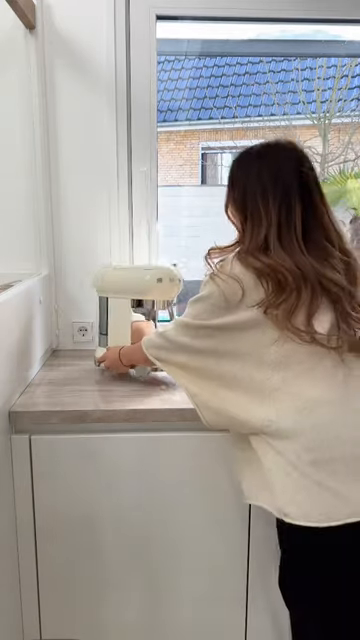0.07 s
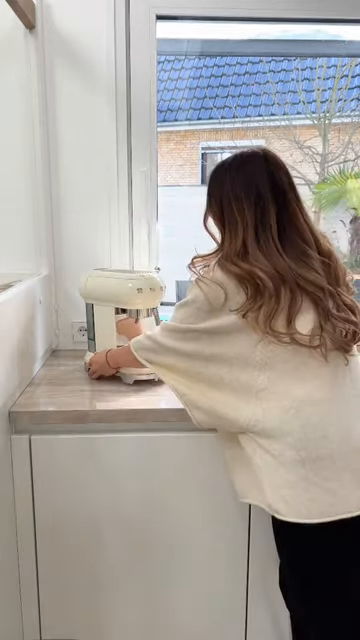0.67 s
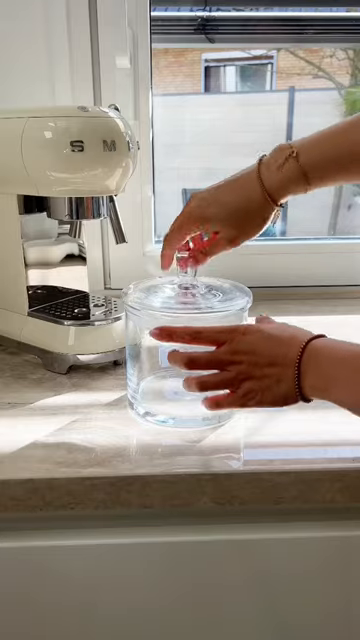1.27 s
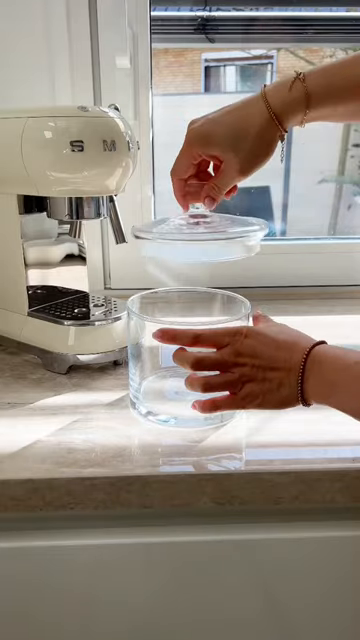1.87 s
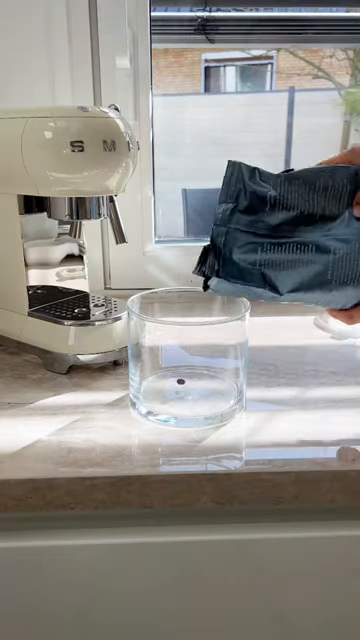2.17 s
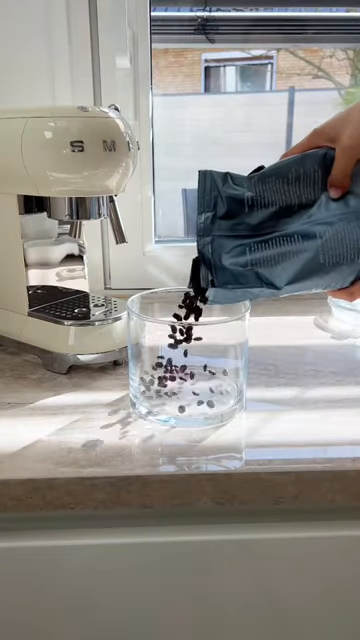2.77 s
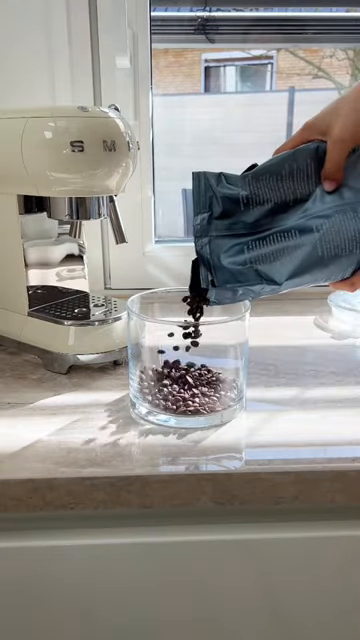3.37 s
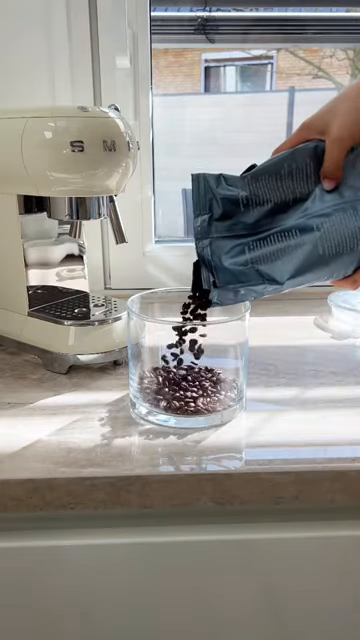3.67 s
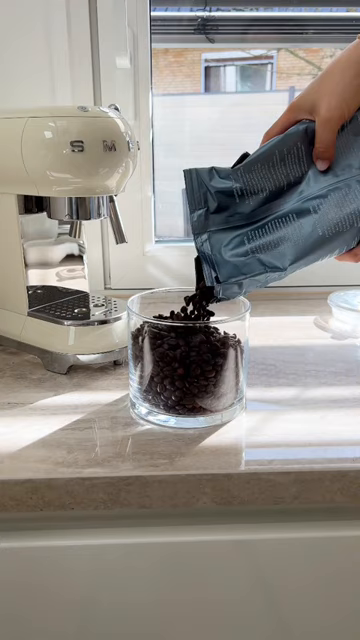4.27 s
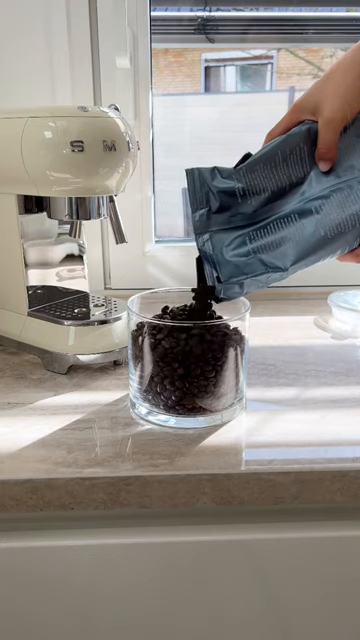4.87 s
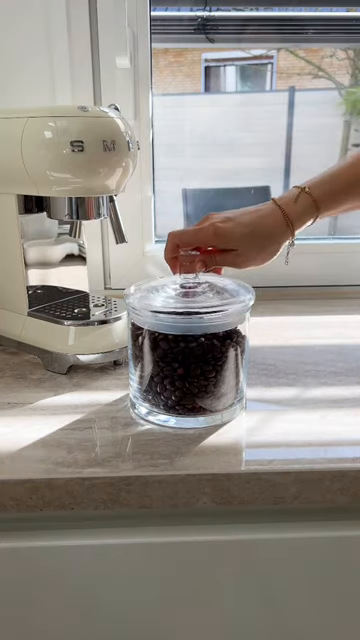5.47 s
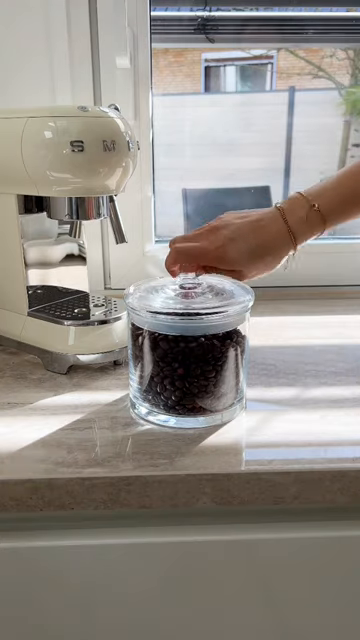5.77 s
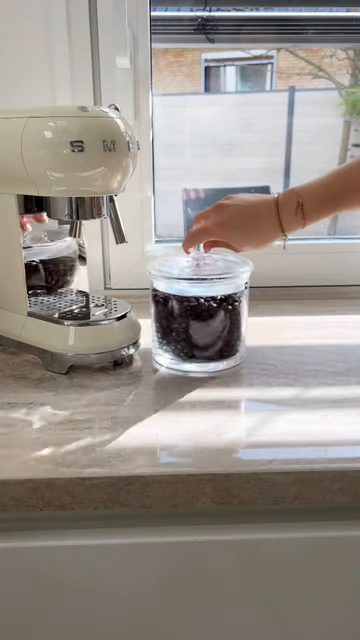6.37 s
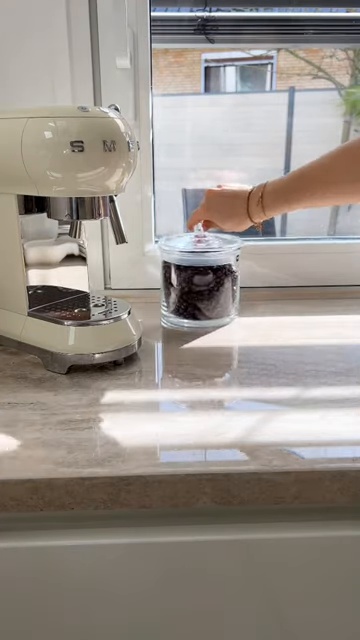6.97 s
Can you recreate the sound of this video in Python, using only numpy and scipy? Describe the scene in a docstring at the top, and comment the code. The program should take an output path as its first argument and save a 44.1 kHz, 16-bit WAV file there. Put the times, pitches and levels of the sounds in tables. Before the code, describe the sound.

A low room rumble lies under a kitchen scene, heard close through a stereo microphone. From about 0.3 seconds a filter holder knocks against an espresso machine, squeaks briefly on its rubber seal and locks with a clack and a low boom near 0.9 seconds. Between 1.3 and 1.8 seconds a glass lid rattles and rubs out of an empty jar, with a tiny squeal. At 2.2 seconds coffee beans tick and tumble inside a bag, and from 2.5 they stream into the jar, clicking brightly and pinging the glass. From about 3.8 seconds the ring is choked by the rising heap and the pour softens, ending near 5.2. The lid clacks back on at 5.5 seconds. From about 6 seconds the full jar scrapes and judders quietly over the stone counter, and the lid settles with small chinks around 7 seconds.

```python
"""Coffee beans pour from a bag into a glass jar on a kitchen counter, close to a stereo microphone.
They click on each other and ping the glass, whose ring is choked as the heap rises.
Before the pour, a filter holder is knocked into an espresso machine and the jar's glass lid is lifted.
After it, the lid clacks back on and the full jar is pushed over the stone, scraping and juddering.
The knocks carry a short kitchen reverberation; a low room rumble lies behind everything."""
import sys
import numpy as np
from scipy import signal
from scipy.fft import rfft, irfft, next_fast_len
from scipy.io import wavfile
from scipy.ndimage import uniform_filter1d, map_coordinates

SR = 44100
rng = np.random.default_rng(int(sys.argv[2]) if len(sys.argv) > 2 else 0)


def pcm_store(signal):
    """Save signal as 16-bit PCM."""
    levels = np.round(np.clip(np.atleast_2d(signal), -1, 1) * 32767)
    wavfile.write(sys.argv[1], SR, levels.astype(np.int16).T)


N = 318843
NOW = np.arange(N) / SR

# starts of the stages that follow the espresso machine: t/s
STAGES = [1.142, 2.137, 5.19, 7.045]
LID_OFF_S, BAG_S, LID_ON_S, REST_S = STAGES
POUR_START_S, POUR_FULL_S = 2.465, 2.964
HEAPED_S, BURIED_S = 3.8, 4.32  # the heap covers the wall, then smothers its low modes too


def amp(db):
    """Decibels to gain."""
    return 10 ** (np.asarray(db) / 20)


def unit(x):
    """Scale to rms 1."""
    return x / np.sqrt(np.mean(x ** 2) + 1e-20)


def unit_attack(x):
    """Scale a blow to rms 1 over its first 30 ms."""
    return x / np.sqrt(np.mean(x[..., :int(.03 * SR)] ** 2) + 1e-20)


def along(points, hz):
    """Interpolate (f/Hz, value) points on a log frequency axis."""
    f, v = np.transpose(points)
    return np.interp(np.log(hz + 1), np.log(f + 1), v)


def curves(rows):
    """One value per sample for each column after the time."""
    s, *cols = np.transpose(rows)
    return [np.interp(NOW, s, c) for c in cols]


def between(start, end):
    """1 between two times, with 4 ms edges."""
    return uniform_filter1d(((NOW >= start) & (NOW < end)) * 1., size=176)


def flutter(depth_db, size):
    """A random gain that changes every size samples or so."""
    knots = rng.standard_normal(N // size + 4)
    return amp(depth_db * map_coordinates(knots, [np.arange(N) / size]))


def swells(rows):
    """A gain that swells briefly at each (t/s, half length/s, level/dB)."""
    return sum(amp(db) * np.exp(-((NOW - s) / half) ** 2) for s, half, db in rows)


def bunching(rows, half_s):
    """dB by which a flow of beans briefly rises or falls at each (t/s, level/dB)."""
    return sum(db * np.exp(-((NOW - s) / half_s) ** 2) for s, db in rows)


def add(track, s, sound):
    """Mix a sound in at time s."""
    part = track[:, round(s * SR):][:, :sound.shape[-1]]
    part += sound[..., :part.shape[1]]


def filtered(x, response):
    """x times a complex response of frequency."""
    n = x.shape[-1]
    m = next_fast_len(n + SR // 2)
    return irfft(rfft(x, m) * response(np.fft.rfftfreq(m, 1 / SR)), m)[..., :n]


def coloured(x, spectrum):
    """x shaped by a (f/Hz, level/dB) spectrum."""
    return filtered(x, lambda hz: amp(along(spectrum, hz)))


def gliding_resonance(x, centre_hz, width_hz):
    """x through one resonance whose centre moves, rms 1."""
    carrier = np.exp(2j * np.pi * np.cumsum(centre_hz) / SR)
    shifted = x / carrier
    real, imag = filtered(np.array([shifted.real, shifted.imag]),
                          lambda hz: (1 + 1j * hz / width_hz) ** -2)
    return unit(((real + 1j * imag) * carrier).real)


# width of diffuse sound at the microphone: f/Hz, side over mid
STEREO_WIDTH = [(100, .02), (300, .11), (550, .65), (2000, .72), (4000, .65), (8000, 1)]
# share of the side that is the mid a quarter cycle late: f/Hz, share
STEREO_SKEW = [(5000, 0), (6000, .45)]
def spread(pair, width=1):
    """Two unrelated signals to left and right: mono bass, wide treble that reaches the right first."""
    def side_response(hz):
        skew = along(STEREO_SKEW, hz)
        return width * along(STEREO_WIDTH, hz) * np.array([-1j * np.sqrt(skew), np.sqrt(1 - skew)])
    side = filtered(pair, side_response).sum(axis=0)
    return np.array([pair[0] + side, pair[0] - side])


def noise(spectrum, width=1):
    """Stereo noise of rms 1."""
    return unit(spread(coloured(rng.standard_normal((2, N)), spectrum), width))


def grains(rate, scatter_db):
    """Random impacts, rate a second; each reaches mid and side with its own strength."""
    hit = rng.random(N) < rate / SR
    strength = amp(scatter_db * np.clip(rng.standard_normal(N), -2, 2))
    return unit(hit * strength * rng.standard_normal((2, N)))


def ring(modes, t, scatter_db=2):
    """One blow on a set of modes (f/Hz, width/Hz, level/dB), each at a new strength."""
    out = 0
    for hz, width, db in modes:
        strength = amp(db + scatter_db * rng.standard_normal()) * np.sqrt(width)
        out += strength * np.exp(-np.pi * width * t) * np.sin(2 * np.pi * (hz * t + rng.random()))
    return out


# room tone, one row a stage: rumble level/dB, air level/dB
ROOM_LEVELS = [(-50, -54.5), (-55.5, -64.5), (-65, -69), (-66, -70), (-69, -75)]
# spectra of the rumble and the air: f/Hz, level/dB
ROOM_RUMBLE = [(20, -25), (45, -7), (110, 0), (220, -5), (400, -14.5), (800, -52.5)]
ROOM_AIR = [(150, -27.5), (330, 3), (650, 4), (1000, -7), (2300, -10), (5000, -24), (10000, -37),
            (15000, -45)]
def room_tone():
    """Low rumble and soft air all round the microphone, steady within each stage."""
    rumble_db, air_db = np.array(ROOM_LEVELS)[np.searchsorted(STAGES, NOW)].T
    return amp(rumble_db) * noise(ROOM_RUMBLE) + amp(air_db) * noise(ROOM_AIR)


# reverberation of the kitchen: f/Hz, t60/s
KITCHEN_DECAY = [(100, 0.73), (500, 0.45), (2500, 0.53), (7000, 0.41), (14000, 0.29)]
def in_kitchen(x, wet_db):
    """The direct sound, with a fresh room tail that reaches the microphone 5 ms later."""
    hz, t, spectra = signal.stft(rng.standard_normal((2, SR // 2)), SR, nperseg=256)
    decay = amp(-60 * t / along(KITCHEN_DECAY, hz)[:, None])
    tail = spread(signal.istft(spectra * decay, SR, nperseg=256)[1])
    tail = np.pad(tail / np.linalg.norm(tail[0]), ((0, 0), (SR // 200, 0)))
    return x + amp(wet_db) * signal.fftconvolve(x, tail, axes=1)[:, :x.shape[1]]


# a soft opening swell, then hands and glass rubbing on glass or stone: t/s, half length/s, level/dB
NOISE_SWELLS = [(0.0, 0.04, -50.5), (1.572, 0.052, -40.5), (1.806, 0.019, -44), (6.557, 0.048, -66),
                (6.7, 0.067, -65)]
# their spectrum: f/Hz, level/dB
SWELL_SPECTRUM = [(200, -21.5), (600, 1.5), (850, 0), (2300, -6.5), (3200, -14.5), (8000, -20.5),
                  (11000, -26.5), (15000, -49)]
def soft_swells():
    """A brief noise dies away at the very start; later the lid rubs free and the jar drags."""
    swelling = swells(NOISE_SWELLS) * noise(SWELL_SPECTRUM, width=0.29) * flutter(0.69, size=130)
    return in_kitchen(swelling, wet_db=-7.5)


# spectra of a knock's body and its crack: f/Hz, level/dB
KNOCK_SPECTRUM = [(130, -36.5), (240, -1), (340, 7), (700, 2.5), (1100, -4.5), (2200, -9), (3200, -17),
                  (6000, -39.5)]
CRACK_SPECTRUM = [(1500, -21.5), (3000, -0.5), (4200, 1.5), (7000, -1), (10000, -10), (15000, -17)]
def knocks(rows, modes, support, contact_t60, corner_hz, attack_s, swell_s,
           ring_db, wet_db, thud_gain_db, body_gain_db):
    """Each contact cracks, rings the object and slowly shakes its support; soft ones have a low corner."""
    out, t = np.zeros((2, N)), np.arange(int(.6 * SR)) / SR
    onset = 1 - np.exp(-(t / attack_s) ** 2)
    for s, body_db, thud_db, crack_db in rows:
        burst = spread(rng.standard_normal((2, len(t))), width=0.42) * amp(-60 * t / contact_t60)
        ringing = amp(ring_db) * unit_attack(ring(modes, t) * onset)
        body = unit_attack(coloured(burst, KNOCK_SPECTRUM)) + ringing
        body = filtered(body, lambda hz: 1 / (1 + 1j * hz / corner_hz))
        crack = amp(crack_db) * unit_attack(coloured(burst, CRACK_SPECTRUM))
        contact = amp(body_db + body_gain_db) * (unit_attack(body) + crack)
        thud = amp(thud_db + thud_gain_db) * unit_attack(ring(support, t) * (1 - np.exp(-t / swell_s)))
        add(out, s, in_kitchen(contact * onset, wet_db) + thud * onset)
    return out


def chime(s, db, modes, attack_s, wet_db):
    """A lasting ring after a contact, centred in front of the microphone."""
    out, t = np.zeros((2, N)), np.arange(SR // 2) / SR
    sound = amp(db) * unit_attack(ring(modes, t) * (1 - np.exp(-t / attack_s)))
    add(out, s, in_kitchen(np.array([sound, sound]), wet_db))
    return out


# course of the gasket's squeak: t/s, f/Hz, level/dB
SQUEAK_PATH = [(.56, 660, -80.5), (.569, 657, -31), (.579, 697, -37), (.591, 754, -35.5),
               (.598, 680, -22.5), (.609, 773, -26), (.622, 770, -41), (.635, 760, -72)]
def gasket_squeak():
    """The holder sticks and slips on its rubber gasket: a rough, rising tone."""
    pitch_hz, level_db = curves(SQUEAK_PATH)
    phase = 2 * np.pi * np.cumsum(pitch_hz * flutter(.5, size=60)) / SR
    rasp = noise([(400, -8.5), (900, 0), (1400, -13), (4500, -18.5), (14000, -45.5)], width=0.93)
    squeak = amp(level_db) * (np.sin(phase) + amp(-9.5) * rasp)
    return in_kitchen(squeak * between(.56, .635), wet_db=-1.5)


# holder against the machine: t/s, relative body level/dB, relative thud level/dB, crack over body/dB
HOLDER_KNOCKS = [(0.316, -23.5, -17.5, -19.5), (0.331, -28.5, -14.5, -21.5), (0.387, -32.5, -23.5, -29.5),
                 (0.404, -40.5, -24.5, -33.5), (0.453, -42.5, -33, -23.5), (0.511, -42.5, -39.5, -12.5),
                 (0.631, -22, -23.5, -18), (0.656, -32.5, -20.5, -7.5), (0.7955, -28.5, -23, -16),
                 (0.8125, -22.5, -33, -12.5), (0.830, -28.5, -21.5, -14.5)]
# modes of the machine and the cabinet under it: f/Hz, width/Hz, level/dB
MACHINE_MODES = [(564, 34, 11), (764, 180, 16.5), (1860, 190, -10.5)]
CABINET_MODES = [(48.8, 2.1, -6.5), (85.5, 14, -1), (101, 12, -1), (114.4, 7, 1.5), (130, 29, 1),
                 (245.4, 20, -4.5), (358.6, 14, -6.5), (407.2, 6, -12.5), (538.3, 14, -11)]
def espresso_machine():
    """The holder bumps the machine, squeaks on the gasket and locks; the cabinet booms."""
    bumps = knocks(HOLDER_KNOCKS, MACHINE_MODES, CABINET_MODES, contact_t60=0.044, corner_hz=3200,
                   attack_s=0.0014, swell_s=0.0027, ring_db=0, wet_db=-0.5,
                   thud_gain_db=-3, body_gain_db=-2.5)
    lock_modes = [(960, 51, -2), (1500, 70, -5), (2000, 200, 0),
                  (2330, 90, -4), (3230, 160, -8), (5400, 900, -12)]
    lock = chime(.813, -28.5, lock_modes, attack_s=0.00045, wet_db=-3)
    boom = chime(.872, -25, [(48, 5.2, 10.5), (71, 14, 7.5), (220, 13, -5)], attack_s=0.011, wet_db=-7.5)
    return (bumps + gasket_squeak() + lock + boom) * between(0, LID_OFF_S)


# lid against the empty jar: t/s, relative body level/dB, relative thud level/dB, crack over body/dB
LID_RATTLES = [(1.277, -28.5, -56.5, -20), (1.398, -21.5, -46, -16.5), (1.472, -18, -24, -16.5),
               (1.508, -24, -26, -20), (1.543, -26.5, -39, -16.5), (1.561, -27, -28.5, -29),
               (1.592, -41, -35, -14)]
# modes of the empty jar and the counter: f/Hz, width/Hz, level/dB
EMPTY_JAR_MODES = [(130, 50, -3), (290, 70, 2), (385, 50, -3), (700, 70, -3), (861, 35, 2), (1310, 70, -1),
                   (1430, 60, -1), (1615, 45, -2), (1950, 150, -8), (2200, 80, -8), (2410, 50, -11)]
COUNTER_MODES = [(54.4, 5.7, -2), (110.5, 5.2, -2), (132.8, 4, -5.5), (160.5, 11, -1), (210, 50, -0.5),
                 (255, 37, -8), (300, 22, 0.5), (376.5, 14, -3.5)]
# hands brushing over glass: f/Hz, level/dB
HAND_SPECTRUM = [(1000, -3), (3000, -6), (7000, -8.5), (10000, -12.5), (13000, -27.5)]
def lid_off():
    """The lid rattles in the neck of the empty jar, then squeals briefly, glass on glass."""
    rattle = knocks(LID_RATTLES, EMPTY_JAR_MODES, COUNTER_MODES, contact_t60=0.078, corner_hz=3200,
                    attack_s=0.00097, swell_s=0.0096, ring_db=-2, wet_db=-5,
                    thud_gain_db=-7.5, body_gain_db=-6)
    squeal = chime(1.56, -34.5, [(1412, 17, 0)], attack_s=0.012, wet_db=-26)
    hands = amp(-61) * noise(HAND_SPECTRUM) * np.interp(NOW, [LID_OFF_S, 1.22, 1.7, 1.85], [0, 1, 1, 0])
    return (rattle + squeal + hands) * between(LID_OFF_S, BAG_S)


# spectra of glass on stone and of the grit between them: f/Hz, level/dB
SCRAPE_SPECTRUM = [(41, -35), (109, 3), (248, -10), (369, -5), (600, -11), (979, -4.5), (1310, -16),
                   (2030, -19), (3620, -22.5), (14000, -42)]
GRIT_SPECTRUM = [(300, -21), (900, -3), (1600, 13), (2300, 6.5), (3300, -11), (5000, -27), (9000, -24),
                 (13000, -58)]
# the base catches on a grain of grit: t/s, half length/s, level/dB
GRIT_CATCHES = [(6.133, 0.0081, -60.5), (6.265, .006, -53.5), (6.402, 0.011, -57), (6.452, .005, -48.5),
                (6.55, .01, -60), (6.627, 0.0044, -58), (6.688, 0.018, -57.5)]
# pitch of a ridge in the grinding that rises as the jar slides: t/s, f/Hz
GRIND_PATH = [(6.1, 1530), (6.45, 2030), (6.56, 2400), (6.78, 2930)]
def jar_slide():
    """The jar's base sticks and slips over the stone; grit under it bites harder as it goes, and a ridge in the
    grinding rises in pitch."""
    start_s, slowing_s = 5.916, 6.75
    speed = np.interp(NOW, [start_s, start_s + 0.28, slowing_s, slowing_s + 0.14], [0, 1, 1, 0])
    slips = flutter(3, size=700)
    scrape = amp(-62) * unit(noise(SCRAPE_SPECTRUM, width=0.89) * slips)
    crunch = grains(rate=500, scatter_db=3)
    grit = in_kitchen(spread(coloured(crunch, GRIT_SPECTRUM), width=0.35), wet_db=-4)
    grit = unit(grit * slips) * amp(np.interp(NOW, [start_s, slowing_s], [-71, -64]))
    catches = in_kitchen(swells(GRIT_CATCHES) * noise(GRIT_SPECTRUM, width=0.31), wet_db=-7)
    grind = amp(-72) * unit(gliding_resonance(crunch[0], curves(GRIND_PATH)[0], width_hz=300) * slips)
    grind = in_kitchen(np.array([grind, grind]), wet_db=-8)
    return speed * (scrape + grind + grit) + catches


# clacks of the lid, and dull bumps as its seal lands and the base catches on the counter:
# t/s, relative body level/dB, relative thud level/dB, crack over body/dB
LID_CLACKS = [(5.4705, -32.5, -47, -11.5), (6.8325, -43.5, -55, -10.5), (6.857, -48.5, -45, -8)]
JAR_BUMPS = [(5.256, -43, -36.5, -42), (5.597, -56.5, -54, -32), (5.947, -58.5, -71.5, -39),
             (6.045, -53.5, -50.5, -42), (6.126, -58.5, -58, -32), (6.16, -49.5, -52, -36),
             (6.177, -50.5, -53, -36), (6.26, -53, -60, -22), (6.396, -54.5, -67, -33),
             (6.449, -50.5, -52, -38), (6.741, -51.5, -49, -32)]
# modes of the full jar, the counter under it and the lid: f/Hz, width/Hz, level/dB
FULL_JAR_MODES = [(385, 29, -4.5), (563, 90, 0), (850, 52, 4), (1166, 60, 6), (1446, 100, 7),
                  (1840, 220, 13), (2280, 93, 12), (2570, 97, 9), (3430, 270, 11.5), (4060, 220, 3)]
LOADED_COUNTER_MODES = [(48.8, 2.3, -5), (73, 5.1, -10), (104.4, 9.1, 7), (137, 5.3, -3), (172, 22, 1.5)]
LID_MODES = [(2374, 9, -10), (2654, 10, -7), (3720, 11, -1), (3784, 5, -9), (3890, 8, 0), (4620, 9, -9),
             (4705, 7, -9), (6180, 9, -7), (6350, 8, -9), (8000, 10, -9)]
def lid_on_and_push():
    """The lid seats with a clack; the full jar judders over the counter; the lid jumps and settles."""
    clacks = knocks(LID_CLACKS, FULL_JAR_MODES, LOADED_COUNTER_MODES, contact_t60=0.028, corner_hz=4060,
                    attack_s=0.00086, swell_s=0.003, ring_db=0, wet_db=-6,
                    thud_gain_db=-5.5, body_gain_db=-1.5)
    bumps = knocks(JAR_BUMPS, FULL_JAR_MODES, LOADED_COUNTER_MODES, contact_t60=0.093, corner_hz=1287,
                   attack_s=0.002, swell_s=0.012, ring_db=-10, wet_db=-7.5,
                   thud_gain_db=-9.5, body_gain_db=-2.5)
    clinks = sum(chime(s, db, LID_MODES, attack_s=.0005, wet_db=-7)
                 for s, db in [(5.471, -53.5), (6.834, -69)])
    settle = chime(7.016, -61.5, [(6260, 130, 0)], attack_s=.0005, wet_db=-12)
    return (clacks + bumps + clinks + settle + jar_slide()) * between(LID_ON_S, REST_S)


# click of a bean's shell, heard close: f/Hz, level/dB
SHELL_SPECTRUM = [(300, -23), (2000, -19), (3000, -23), (4000, -22), (5200, -18), (6500, -8), (8500, -7),
                  (10500, -5), (11400, 0), (12800, -3), (15700, -4.5)]
def tick(t, rattle_db, rattle_t60):
    """A sharp, bright click with a short rattle, peak 1."""
    fade = amp(-60 * t / 0.0089) + amp(rattle_db - 60 * t / rattle_t60)
    click = coloured(spread(rng.standard_normal((2, len(t)))), SHELL_SPECTRUM) * fade
    return click / abs(click).max()


# ticks of the bag and beans, and the glass lid's small chink at 7.016 s: t/s, peak level/dB
SMALL_TICKS = [(2.208, -30), (2.256, -32), (2.338, -36.5), (2.441, -34), (4.699, -36), (7.016, -38.5),
               (7.152, -50)]
def small_ticks():
    """Bag and beans tick, with a hollow tap while the bag is open; the glass lid chinks as it settles."""
    out, t = np.zeros((2, N)), np.arange(SR // 8) / SR
    bag_modes = [(664, 200, -1), (960, 290, 1.5), (1760, 450, 5), (2360, 240, -0.77)]
    for s, peak_db in SMALL_TICKS:
        tap = amp(-18) * unit_attack(ring(bag_modes, t)) * (s < LID_ON_S)
        add(out, s, amp(peak_db) * (tick(t, rattle_db=-11.5, rattle_t60=0.12) + tap))
    return out


# beans tumbling inside the bag: f/Hz, level/dB
TUMBLE_SPECTRUM = [(60, -46.5), (110, -10.5), (330, -7), (540, -3.5), (920, -1.5), (1200, -7), (1850, -3),
                   (2450, -6), (2900, -11.5), (4500, -12.5), (7000, -14.5), (11000, -16.5), (15500, -23.5)]
# their small slides and stalls: t/s, level over the steady tumbling/dB
BAG_SLIDES = [(2.25, 3.5), (2.42, -2.5), (3.53, -3), (3.97, 3.5), (4.47, 1), (4.6, 3)]
def bag_tumble():
    """Beans tumble over each other in the bag, fading as it runs out."""
    taps = unit(spread(coloured(grains(rate=1300, scatter_db=1.5), TUMBLE_SPECTRUM), width=0.27))
    rush = noise(TUMBLE_SPECTRUM, width=0.54) * flutter(1.85, size=220)
    level_db = np.interp(NOW, [4.92, LID_ON_S], [-48, -55]) + bunching(BAG_SLIDES, half_s=0.03)
    return unit(amp(-4.5) * taps + rush) * amp(level_db)


# modes of the jar's wall, bare and covered by beans: f/Hz, width/Hz, level/dB
BARE_MODES = [(4610, 34, 0), (5570, 70, -17), (6025, 50, -10), (7448, 26, -6), (7682, 20, -8),
              (9750, 50, -11), (9920, 50, -12), (10960, 40, -9), (13690, 50, -13)]
CHOKED_MODES = [(3320, 80, -9), (4690, 55, -2), (5660, 150, -7), (6030, 80, 0), (6310, 60, 0),
                (7190, 120, -2), (8180, 60, -4), (8760, 90, -2), (10240, 55, -2), (10620, 90, -6),
                (12880, 88, -5)]
def wall_modes(s):
    """The jar's modes at time s: bare, then choked by the heap, then with the low ones smothered."""
    if s < HEAPED_S:
        return BARE_MODES
    return [(hz, width, db - 7 * (s >= BURIED_S and hz < 6200)) for hz, width, db in CHOKED_MODES]


def glass_wall(modes, rate, scatter_db, evenness):
    """Beans hit the wall at random places, weighting the modes anew; resting ones damp wide swings."""
    hits = grains(rate, scatter_db)[0]
    out, t = np.zeros((2, N)), np.arange(SR // 8) / SR
    contact = 1 - np.exp(-t / .0008)
    for hz, width, db in modes:
        mode = np.exp(-np.pi * width * t) * contact * np.exp(2j * np.pi * hz * t)
        swing = signal.oaconvolve(hits * rng.standard_normal((2, N)), mode[None], axes=1)[:, :N]
        damping = (abs(swing) + abs(swing).mean() / 10) ** evenness
        out += amp(db) * unit(swing.imag / damping)
    return unit(spread(out, width=0.48))


# beans that hit the glass hard: t/s, ring level/dB, tick peak level/dB
HARD_LANDINGS = [(2.177, -50, -24), (2.461, -49, -21), (2.52, -47, -24), (2.566, -44, -28),
                 (2.611, -43.5, -27), (2.657, -47, -22.5), (2.725, -41, -33), (2.742, -46.5, -27),
                 (2.772, -44.5, -24), (2.867, -51, -20), (2.908, -40, -27.5), (2.926, -60.5, -15),
                 (2.975, -48.5, -18), (3.03, -41.5, -27), (3.11, -40, -29), (3.162, -43, -18.5),
                 (3.217, -46.5, -21), (3.258, -48, -31), (3.829, -53, -38), (3.875, -46.5, -38),
                 (3.902, -54, -38), (4.062, -55, -35), (4.085, -49, -31), (4.133, -48.5, -34),
                 (4.151, -50, -36), (4.169, -46, -34), (4.192, -47, -32), (4.222, -50, -32),
                 (4.474, -51, -34), (4.637, -52, -33), (4.8, -51, -34), (4.868, -50, -37),
                 (4.898, -52, -34), (4.98, -52.5, -40), (5.165, -52, -40), (5.179, -54, -44)]
def single_beans():
    """Beans that land hard tick and ping the glass; on the heap the ring is choked."""
    out, t = np.zeros((2, N)), np.arange(SR // 8) / SR
    contact = 1 - np.exp(-t / .0005)
    for s, ring_db, tick_db in HARD_LANDINGS:
        ping = unit_attack(ring(wall_modes(s), t, scatter_db=-3) * contact)
        add(out, s, amp(ring_db) * ping + amp(tick_db) * tick(t, rattle_db=-10.5, rattle_t60=0.094))
    return out


def shell_pings(count, centre_hz, octaves, t60, scatter_db):
    """Every bean has its own short, high ring; count of them fall during the pour."""
    when, pitch, size, side = np.transpose(rng.standard_normal((count, 4)))
    starts = (SR * (POUR_START_S + (LID_ON_S - POUR_START_S) * (when % 1))).astype(int)
    hz = np.minimum(centre_hz * 2 ** (octaves * pitch), SR / 2)
    k = np.arange(SR // 50)
    strength = amp(scatter_db * np.clip(size, -2, 2))[:, None]
    pings = strength * np.sin(2 * np.pi * hz[:, None] * k / SR) * amp(-60 * k / SR / t60)
    samples = (starts[:, None] + k).ravel()
    pair = np.array([np.bincount(samples, (gain * pings).ravel(), N)[:N]
                     for gain in (1, np.sign(side)[:, None])])
    return pair / pair[:, starts.min():starts.max()].std()


def bean_clatter():
    """Falling beans click on each other and ring, arriving in little bunches; rms 1."""
    t = np.arange(SR // 50) / SR
    shell = rng.standard_normal((2, len(t))) * amp(-60 * t / 0.023)
    clicks = unit(signal.oaconvolve(grains(rate=560, scatter_db=-2), shell, axes=1)[:, :N])
    pings = shell_pings(count=2000, centre_hz=11000, octaves=.33, t60=0.02, scatter_db=3.5)
    impacts = unit(spread(coloured(clicks + amp(-2) * pings, SHELL_SPECTRUM)))
    hiss = amp(1.5) * noise(SHELL_SPECTRUM)
    return unit((impacts + hiss) * flutter(1.2, size=300))


# the stream bunches up and thins out: t/s, level over the stream/dB
STREAM_CLUMPS = [(2.616, 6.5), (2.663, 4.5), (2.705, -5), (2.745, 4), (2.822, -2), (2.87, 3.5),
                 (2.944, 1.5), (3.03, 2.5), (3.146, -5.5), (4.642, 3.5), (4.805, 4)]
def bean_pour():
    """Close up, the stream swells as the bag tips; the heap softens the fall and chokes the glass."""
    tipping = amp(-17.5 * np.exp(-np.maximum(NOW - POUR_START_S, 0) / 0.16))
    surges = flutter(0.5, size=SR // 19)  # the beans leave the bag unevenly
    flow = tipping * surges * amp(bunching(STREAM_CLUMPS, half_s=0.015))
    filling_s = np.maximum(NOW - POUR_FULL_S, 0)
    clatter = bean_clatter() * amp(-32.5 - 6 * filling_s)
    bare = glass_wall(BARE_MODES, rate=530, scatter_db=2.5, evenness=.3)
    bare *= (1 - between(HEAPED_S, LID_ON_S)) * amp(-40 - 8 * filling_s)
    choked = sum(glass_wall(wall_modes(start), rate=310, scatter_db=0, evenness=0) * between(start, end)
                 for start, end in [(HEAPED_S, BURIED_S), (BURIED_S, LID_ON_S)])
    choked *= amp(-46.5 - 8 * (NOW - HEAPED_S))
    stream = flow * (clatter + bare + choked) * between(POUR_START_S, LID_ON_S)
    return (stream + bag_tumble() + single_beans()) * between(BAG_S, LID_ON_S)


def scene():
    """The work at the counter in the foreground, the kitchen's room tone behind it."""
    counter = espresso_machine() + lid_off() + bean_pour() + small_ticks() + lid_on_and_push()
    return counter + soft_swells() + room_tone()


def record(dry):
    """The microphone drops the deepest bass and keeps nothing above its band limit."""
    low_cut_hz, top_hz = 37, 15780
    thinned = signal.sosfilt(signal.butter(4, low_cut_hz, "high", fs=SR, output="sos"), dry)
    return filtered(thinned, lambda hz: np.clip((top_hz - hz) / 200 + .5, 0, 1))


dry = scene()
out = record(dry)
pcm_store(out)
```